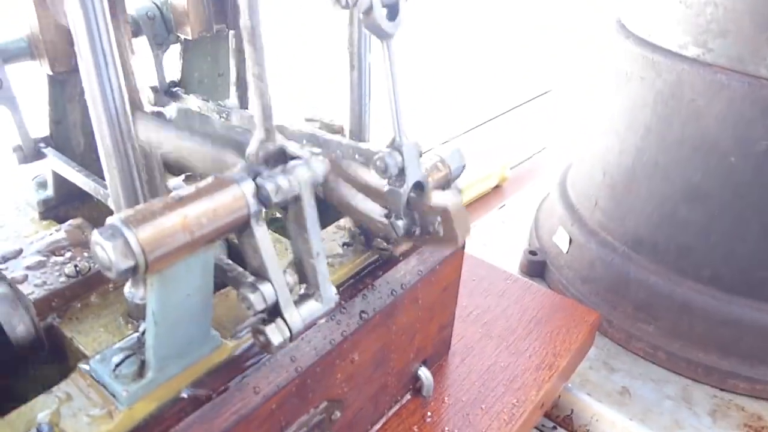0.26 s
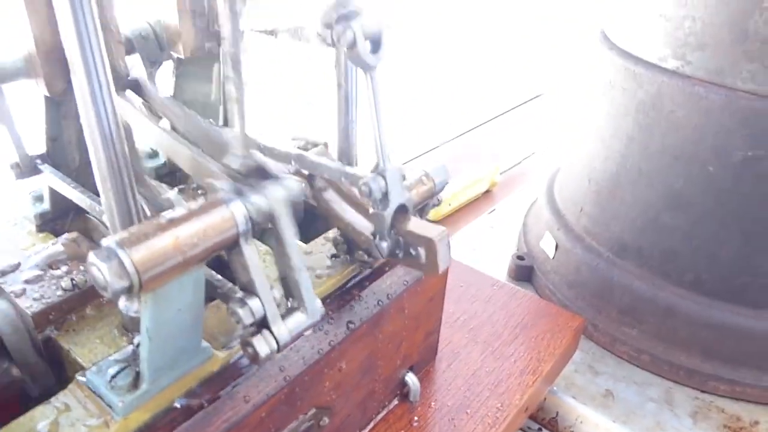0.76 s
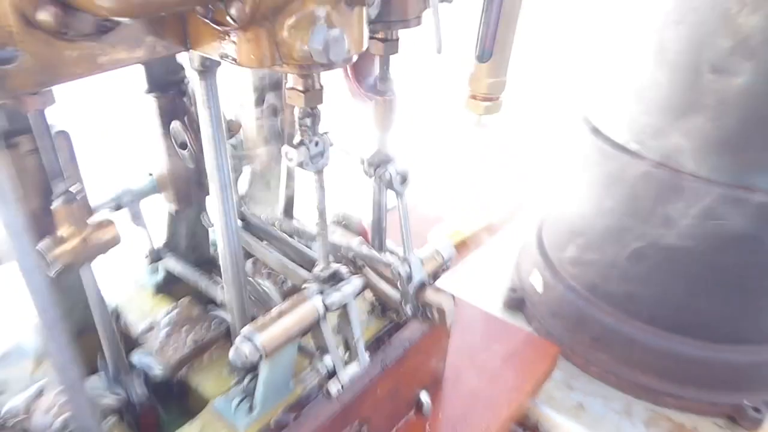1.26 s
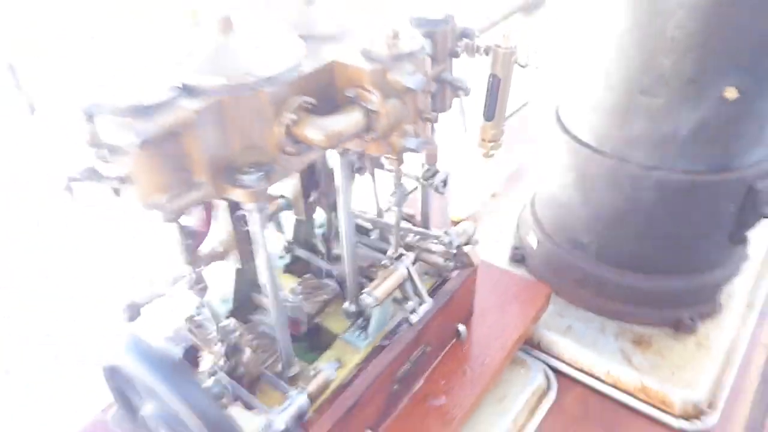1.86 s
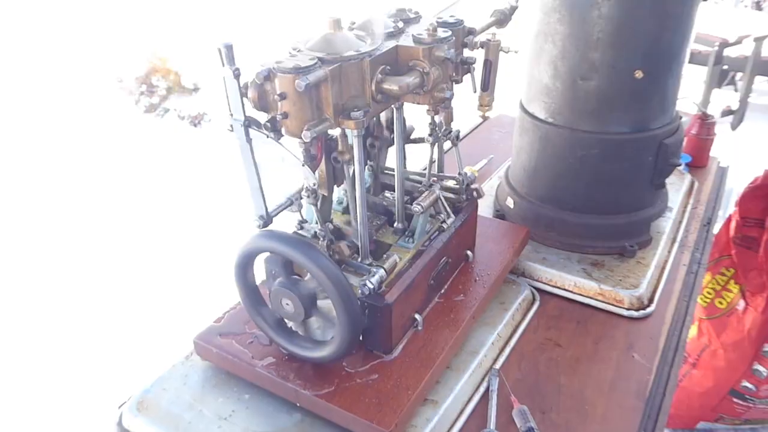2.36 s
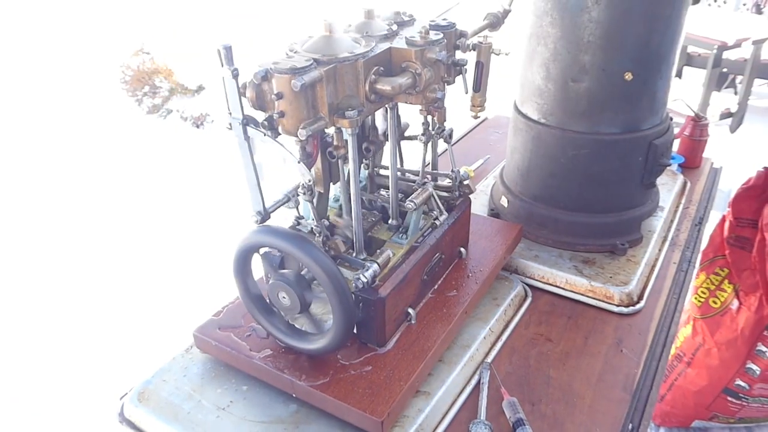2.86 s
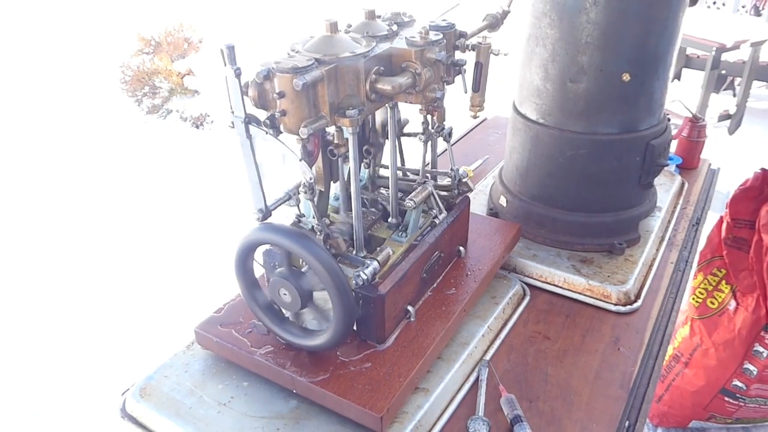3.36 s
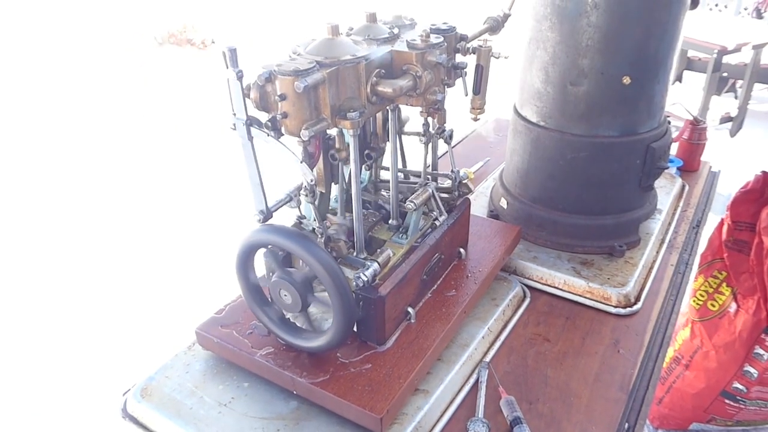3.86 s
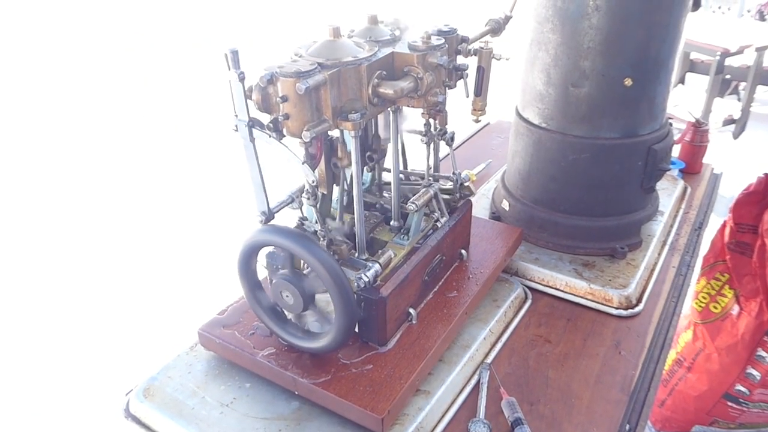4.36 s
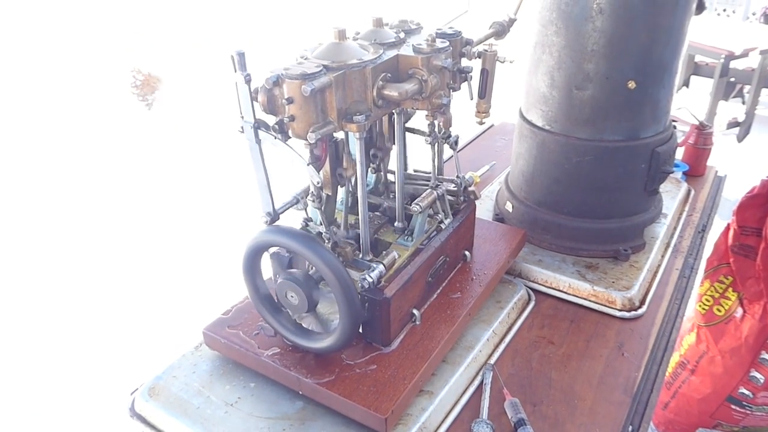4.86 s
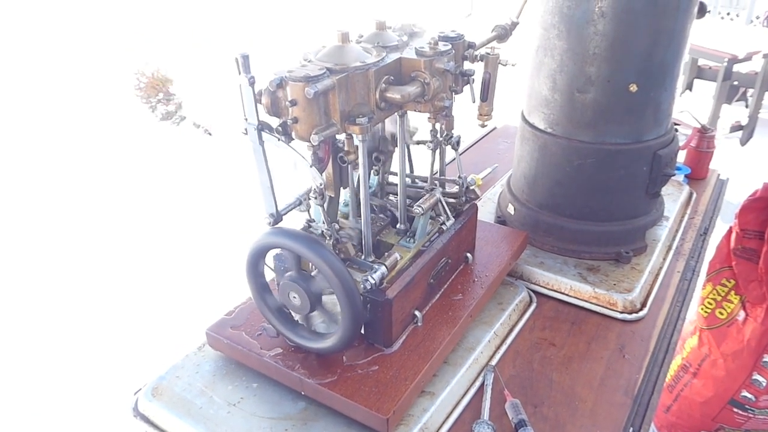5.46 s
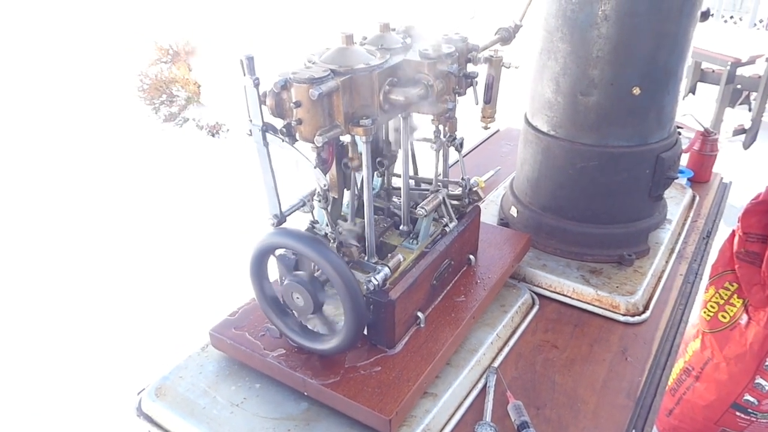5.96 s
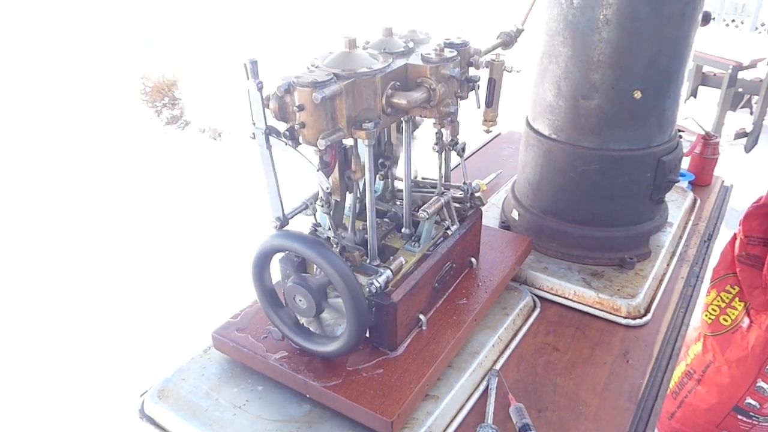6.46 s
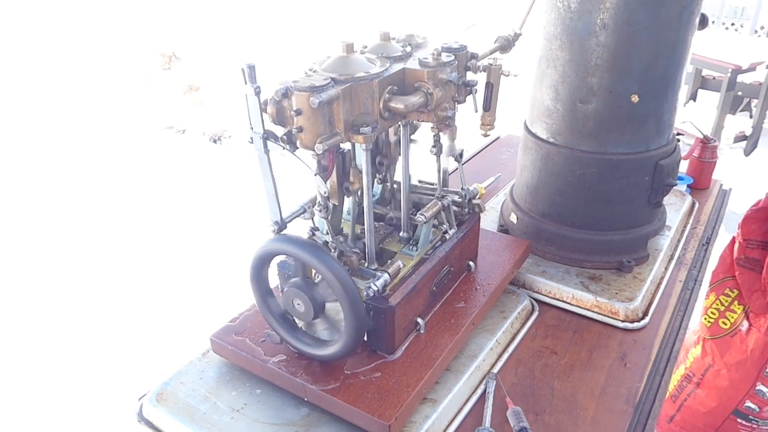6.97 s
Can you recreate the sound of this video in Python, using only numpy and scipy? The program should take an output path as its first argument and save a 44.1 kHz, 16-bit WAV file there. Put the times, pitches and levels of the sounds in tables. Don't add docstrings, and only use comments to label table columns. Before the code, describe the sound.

A small steam engine chuffs rapidly and evenly, hissing, spitting and knocking close up, then after a brief silent gap continues from slightly farther back.

```python
import sys
import numpy as np
from scipy import signal
from scipy.fft import rfft, irfft, next_fast_len
from scipy.io import wavfile
from scipy.ndimage import map_coordinates

SR = 44100
rng = np.random.default_rng(int(sys.argv[2]) if len(sys.argv) > 2 else 0)


def unload_wav(signal):
    wavfile.write(
        sys.argv[1],
        SR,
        np.round(np.clip(np.atleast_2d(signal).T, -1, 1) * 32767).astype(np.int16),
    )


def volts_from_db(level):
    exponent = np.asarray(level, float) / 20
    return 10 ** exponent


N = 317961

# start_s, end_s
BREAK_S = (2.3885, 2.6635)
# end_s, up_puff_db, down_puff_db, slam_db
TURNS = [(.17, -50, -50, -50), (0.448, -50, -27, -27), (0.728, -26, -26.5, -26), (0.974, -23.5, -19.5, -21),
         (1.215, -21.5, -25, -24.5), (1.452, -22.5, -25.5, -23), (1.691, -22, -21, -24.5),
         (1.941, -24, -24, -26), (2.185, -26, -27, -30), (2.431, -24, -26.5, -32), (2.69, -33, -35.5, -30),
         (2.948, -33, -30.5, -40), (3.2, -25.5, -28, -27.5), (3.458, -28, -24.5, -28),
         (3.715, -25, -27.5, -26.5), (3.981, -24, -27.5, -29), (4.242, -27, -28.5, -24.5),
         (4.507, -27.5, -29, -21.5), (4.768, -27.5, -27.5, -25.5), (5.033, -26, -25.5, -25),
         (5.295, -25.5, -26.5, -22.5), (5.56, -24.5, -26, -23), (5.826, -25, -26, -22),
         (6.094, -26, -26.5, -22), (6.361, -27, -26.5, -24.5), (6.625, -26, -28, -20.5),
         (6.883, -24, -25.5, -24), (7.146, -24.5, -25.5, -23), (7.405, -24, -26, -24)]
BOTTOM_CENTRE = 0.547
# centre_hz, width_hz, close_db, back_db
BED = [(106, 30, -16, -8.5), (152, 17, 0.5, 3), (199, 61, -11, -2.5), (290.4, 95, -12.5, -3)]


def at_hz(points, hz, column=1):
    table = np.array(points)
    return np.interp(np.log(hz), np.log(table[:, 0]), table[:, column])


def rms_one(x):
    return x / np.sqrt(np.mean(x ** 2))


def drift(per_s):
    r = np.exp(-40 * np.pi * per_s / SR)
    draws = rng.standard_normal(N // 20 + 402)
    slow = signal.lfilter([1], [1, -2 * r, r * r], draws)[400:]
    return np.interp(np.arange(N) / 20, np.arange(len(slow)), rms_one(slow))


def gusts(flicker_db):
    lumps = 0.59 * drift(30) + drift(37) + 1.38 * drift(180)
    return rms_one(volts_from_db(flicker_db * lumps))


def turbulence(pair, length, lead_s):
    size = next_fast_len(length, True)
    hz = np.arange(size // 2 + 1) * SR / size + 1
    mid, side = rfft(rng.standard_normal((2, size)))
    alike = np.clip(at_hz(pair, hz), 0, 1)
    lead_rad = at_hz(pair, hz, column=3) + 2 * np.pi * hz * lead_s
    tilt = volts_from_db(at_hz(pair, hz, column=2) / 2) * np.exp(.5j * lead_rad)
    same = np.sqrt(1 + alike) * mid
    differ = np.sqrt(1 - alike) * side
    return hz, np.array([(same + differ) * tilt, (same - differ) / tilt]), size


def both_places(colours, patchy_db, lead_s):
    # band_hz, likeness, left_right_db, left_lead_rad
    pair_close = [(59.2, 0.6, -0.5, 0.092), (200, 1, -1, 0), (800, 0.87, 1, 0.39), (1440, 0.53, 9, 0.72),
                  (2400, 0.61, 4.5, -0.55), (5200, 0.64, 0.5, -0.71), (7120, 0.95, 0, -1),
                  (8400, 0.36, -5.5, -1.3), (9300, 0.62, -5.5, 0.6), (13000, 0.55, 0.5, 0.15)]
    # band_hz, likeness, left_right_db, left_lead_rad
    pair_back = [(60, 0.73, 3, -0.11), (200, 1, -2.2, 0.12), (1100, 0.86, 1, 0.23), (2100, 0.85, 2, 0.15),
                 (4460, 0.84, 0.5, -0.24), (7600, 0.85, 1.3, -0.35), (9200, 1, -0.5, -1),
                 (10300, 0.74, -5.5, -0.023), (11900, 0.41, 3, -0.05)]
    cut = int(BREAK_S[0] * SR)
    gains = [volts_from_db(patchy_db * drift(35)) for _ in colours]
    parts = []
    for place, pair, span in ((0, pair_close, slice(0, cut)), (1, pair_back, slice(cut, N))):
        length = span.stop - span.start
        hz, white, size = turbulence(pair, length, lead_s)
        patches = [gain[span] * irfft(colour(hz, place) * white, size)[:, :length]
                   for colour, gain in zip(colours, gains)]
        parts.append(rms_one(sum(patches)))
    return np.hstack(parts)


def through(modes, flicker_db, lead_s=0, patchy_db=2.0):
    def response(mode):
        centre_hz, width_hz, *level_db = mode
        return lambda hz, place: volts_from_db(level_db[place]) / (1 + ((hz - centre_hz ** 2 / hz) / width_hz) ** 2)
    return both_places([response(mode) for mode in modes], patchy_db, lead_s) * gusts(flicker_db)


def swells(times, levels_db, rise_s, fall_s, squareness=2):
    out = np.zeros(N + SR)
    for s, level_db, rise, fall in np.broadcast(times, levels_db, rise_s, fall_s):
        at = np.arange(int((s - 4 * rise) * SR), int((s + 4 * fall) * SR))
        late = at / SR - s
        span = np.where(late < 0, rise, fall)
        out[at] += volts_from_db(level_db) * np.exp(-.5 * np.abs(late / span) ** squareness)
    return out[:N]


def at_share(share):
    s = np.array(TURNS)[:, 0]
    return s[:-1] + share * np.diff(s)


def leaks():
    # time_s, low_db, hiss_db
    steady = [(0, -43, -34.5), (.18, -37.5, -32), (.23, -40, -39.5), (.34, -44, -25), (.47, -45, -26.5),
              (0.62, -37.5, -28.5), (.8, -39, -27.5), (1.2, -37.5, -25), (1.8, -35, -27), (2.4, -39.5, -29),
              (2.7, -35, -26.5), (3, -41.5, -35), (3.501, -36.5, -29.5), (4, -37.5, -30.5),
              (4.5, -43.5, -34), (4.998, -41, -32), (6, -43, -32.5), (7.21, -41.5, -31)]
    # band_hz, level_db (per Hz)
    low_spectrum = [(24, -61), (40, -24), (163, -4.5), (383, -2.5), (498, -1), (1060, -4.5), (1510, -11.5),
                    (2000, -11), (2600, -35), (4400, -120)]
    # band_hz, level_db (per Hz)
    hiss_spectrum = [(880, -30), (1500, -3), (2260, 5), (2890, 6), (3180, 6.5), (5040, 1), (6620, 2.5),
                     (7450, 6), (7900, 1.5), (10300, 12), (12900, -9.5), (14500, -8), (15500, -58)]
    # band_hz, change_db
    hiss_close = [(1200, -3.5), (2000, -3), (3500, -3.5), (5200, 1.5), (6600, 4.5), (9000, -2), (11000, -1)]
    # delay_s, half_length_s, low_share_lost, hiss_share_lost
    sags = [
        (0.041, 0.038, 0.14, 0.57),
        (0.045, 0.013, 0.39, 0.42),
    ]
    deeper_close = 1.08

    s, low_db, hiss_db = np.transpose(steady)
    now = np.arange(N) / SR
    lulls = [swells(at_share(share) + delay, 0, half, half)
             for share, (delay, half, *_) in zip((BOTTOM_CENTRE, 0.98), sags)]
    lost = np.array(sags)[:, 2:].T @ lulls * np.where(now < BREAK_S[0], deeper_close, 1)
    keep_low, keep_hiss = 1 - np.clip(lost, 0, .9)

    def roar_colour(hz, place):
        return volts_from_db(at_hz(low_spectrum, hz))

    def hiss_colour(hz, place):
        return volts_from_db(at_hz(hiss_spectrum, hz) + (1.5 - place) * at_hz(hiss_close, hz))

    low = both_places([roar_colour], 3.55, 0) * gusts(0.49) * keep_low
    hiss = both_places([hiss_colour], 0.54, -0.0000022) * gusts(1) * keep_hiss
    return volts_from_db(np.interp(now, s, low_db) + 1.5) * low + volts_from_db(np.interp(now, s, hiss_db) + 1.0) * hiss


def puffs():
    # puff_turn_share, half_length_turn_share,
    # whistle_close_db, whistle_back_db, jet_close_db, jet_back_db
    strokes = [
        (0.346, 0.1, 2.5, -1.05, -5, 4.5),
        (0.85, 0.084, 2.5, -2.9, -8, 0),
    ]
    # time_s, lift_db
    sharpness = [(.4, -0.5), (.56, 6), (.8, -2), (1.05, -2.5), (1.5, -4), (1.9, -4), (2.1, 2), (2.4, -2),
                 (2.8, -0.5), (3.1, -3.5), (3.8, -6), (4.3, -0.5), (4.8, -2.5), (5.4, -2.5), (5.8, -1),
                 (6.4, 0.5), (7.21, -2.5)]
    # up_chimney_db, down_length_factor, down_chimney_db
    blows = [(-2.5, 1.33, -3.5), (0, 0.84, 2.5), (0.5, 0.83, -4), (-2.5, 1.17, -.5), (-1, 1.17, 1.5),
             (0.5, 0.91, -2.5), (1.5, 1.3, -2.5), (-1.5, 0.83, 2), (-1, 1.02, 2), (-.5, 2.3, 1),
             (3, 2.4, -3.5), (1.5, 1.8, -3), (1.5, 1.08, -5), (-3.5, 1.2, 0), (-2, 0.87, -0.5),
             (1.5, 0.98, 3.5), (2.5, 1.26, -1.5), (1, 0.94, 0.5), (0, 0.69, -0.5), (0, 1.32, 1),
             (-1.5, 0.92, 0.5), (2.5, 1.04, 0), (2.5, 1.04, 3), (4.5, 0.99, -0.5), (0, 1.19, 1),
             (3.5, 1.14, -0.5), (0, 0.99, -1), (-0.5, 1.02, -.5)]
    jet_follows = 0.9

    rows = []
    ends, up_db, down_db, _ = np.transpose(TURNS)
    up_trim_db, *down = np.transpose(blows)
    per_stroke = zip(strokes, (up_db[1:], down_db[1:]), ((1, up_trim_db), down))
    for (share, half, *lift_db), chimney_db, (stretch, boom_db) in per_stroke:
        s = at_share(share)
        whistle_db, jet_db = np.reshape(lift_db, (2, 2))[:, (s > BREAK_S[0]).astype(int)]
        sharp_db = np.interp(s, *np.transpose(sharpness))
        rows.append([s, chimney_db,
                     chimney_db + whistle_db + sharp_db,
                     chimney_db + jet_db + jet_follows * sharp_db,
                     half * stretch * np.diff(ends), boom_db])
    return np.hstack(rows)


def bent(x, percent):
    at = np.arange(N) + np.cumsum(percent) / 100
    return np.array([map_coordinates(side, [at], order=3, mode="mirror") for side in x])


def exhaust():
    chimney = [(482, 107, 5, -9.5), (637, 65, -4.5, -3.5), (803, 110, -1, -23), (1008, 450, 4, -5.5),
               (1059, 150, -6, -5.5)]
    # centre_hz, width_hz, close_db, back_db
    blast_pipe = [(2080, 1400, -0.5, -4), (2460, 90, -5, 0), (2820, 90, -9, 5), (2952, 96, 8, 4.5),
                  (3170, 330, 1.5, -6), (4400, 5600, -5, -7)]
    # centre_hz, width_hz, close_db, back_db
    whistle = [(5740, 360, -11, -3.5), (6650, 360, -3.5, 2), (6990, 340, 6.5, -23), (7366, 370, -4.5, 2)]
    # centre_hz, width_hz, close_db, back_db
    jet = [(8500, 300, -14, -2), (9210, 380, 6, 6), (10310, 420, 8, 4.5), (11250, 570, -6, -12.5),
           (14100, 1200, -30.5, -16)]
    # centre_hz, width_hz, close_db, back_db
    pop = [(506, 710, 1.5, -6), (627, 650, -6, -8)]
    # time_s, pitch_change_percent
    whistle_creep = [
        (.45, -1.43),
        (0.902, -0.86),
        (1.301, 0.36),
        (1.65, 1.76),
        (2.0, .4),
        (2.38, 0.32),
    ]
    whistle_sag = 0.76
    idle_s, idle_half_s, idle_whistle_db, idle_jet_db = 0.06, 0.088, -37, -36

    s, chimney_db, whistle_db, jet_db, half, boom_db = puffs()
    now = np.arange(N) / SR
    idle = np.exp(-.5 * ((now - idle_s) / idle_half_s) ** 2)

    chimney_puff = swells(s, chimney_db + boom_db - 1.5, 0.88 * half, 1.03 * half, 2.22)
    out = through(chimney, 1.16, patchy_db=2.5) * chimney_puff
    pipe_puff = swells(s, chimney_db - 5.5, 1.18 * half, 1.19 * half, 2.74)
    out += through(blast_pipe, 0.96, patchy_db=4.0) * pipe_puff

    rising = np.gradient(swells(s, 0, half, half)) * SR * half.mean() * (np.arange(N) < BREAK_S[0] * SR)
    creep = np.interp(now, *np.transpose(whistle_creep), right=0)
    whistle_puff = swells(s + 0.0014, whistle_db + 0.71, 1.07 * half, 0.9 * half, 2.7)
    whistling = bent(through(whistle, 0.96), creep + whistle_sag * rising)
    out += whistling * (whistle_puff + volts_from_db(idle_whistle_db) * idle)

    jet_puff = swells(s + 0.0079, jet_db - .8, 1.18 * half, 0.5 * half)
    out += through(jet, 0.82) * (jet_puff + volts_from_db(idle_jet_db) * idle)
    out += through(pop, 1.3) * swells(s - half, chimney_db - 15.5, 0.0018, 0.016)
    return out + through(BED, 0.99) * swells(s - .008, chimney_db - 18.0, 0.48 * half, 3.02 * half)


def crackle():
    # time_s, drops_per_s, size_db
    wetness = [
        (0, 190, -33),
        (.6, 60, -46),
        (2.3, 160, -21.5),
        (2.7, 330, -27.5),
        (3.3, 220, -23.5),
        (3.6, 120, -27),
        (4.399, 80, -27.5),
        (5, 28, -46),
        (7.21, 20, -45),
    ]
    draws = rng.random((1500, 5))
    times = .001 + draws[:, 0] * (N / SR - .02)
    s, per_s, size_db = np.transpose(wetness)
    level = np.interp(times, s, size_db) - 6.6 * np.log(draws[:, 1] + .1)
    rows = np.transpose([times, level - 8 * draws[:, 2], level - 22.0 + 12 * draws[:, 4]])
    return rows[draws[:, 3] * 1500 * SR / N < np.interp(times, s, per_s)]


def spits():
    # time_s,
    # body_db, bright_db, low_db
    ticks_close = [(0.065, -27, -24, -28), (0.1205, -19, -28, -35), (0.2162, -22, -31, -22),
                   (0.2496, -23, -24, -26), (0.399, -25, -26, -7), (0.6704, -42, -34, -19),
                   (0.7063, -29, -20, -22), (0.7896, -21, -21, -17), (0.859, -19, -22, -14),
                   (0.9153, -23, -20, -20), (1.0281, -12, -22, -13), (1.11, -13, -15.5, -13),
                   (1.281, -9, -22.5, -11), (1.339, -18, -24, -12), (1.3857, -21, -23, -19.5),
                   (1.4292, -16, -23, -30.5), (1.501, -18, -28, -17.5), (1.5145, -18, -25, -22),
                   (1.6576, -10, -20, -23), (1.7465, -12, -24.5, -25), (1.891, -24, -27.5, -21),
                   (1.906, -8.5, -23.5, -22), (2.2303, -20, -29.5, -17), (2.2973, -13.5, -26.5, -23)]
    # time_s, body_db, bright_db, low_db
    ticks_back = [(2.718, -20, -24, -9), (2.781, -19, -24, -27), (2.805, -11, -24, -23),
                  (2.9204, -11, -14, -28), (3.0748, -18, -24, -8), (3.1058, -24, -23, -14),
                  (3.246, -23, -19, -24), (3.3448, -17.5, -17, -19), (3.363, -29, -34, -24),
                  (3.387, -19, -32, -17), (3.5015, -31, -30, -19), (3.538, -15, -24, -19),
                  (3.603, -18, -24, -18), (3.6404, -17, -24, -12), (3.7808, -19, -28, -10),
                  (3.8564, -12, -21, -27), (3.916, -15, -20, -37), (4.0203, -12, -24, -7),
                  (4.0472, -30, -28, -28), (4.0683, -16, -26, -24), (4.1309, -17, -14, -16),
                  (4.1654, -21, -24, -28), (4.2192, -10.5, -26, -23), (4.3205, -12, -27, -11),
                  (4.3842, -26, -18, -10), (4.6196, -15, -24, -10), (4.6511, -26, -16, -7.5),
                  (4.7391, -17, -24, -23), (4.9107, -19, -23, -15), (4.9666, -25, -27, -28),
                  (5.1751, -24, -29, -11), (5.2225, -32, -28, -13), (5.342, -24, -27, -22),
                  (5.44, -20, -31, -17), (5.7034, -32, -36, -11.5), (5.8743, -19, -21, -31),
                  (5.9696, -26, -26, -12), (6.2366, -19, -17, -8.5), (6.5015, -17.5, -21, -13),
                  (6.7643, -15.5, -24, -10), (7.026, -30, -31, -12), (7.088, -22, -30, -22)]
    # time_s, body_db, bright_db
    drops_close = [(.149, -12.5, -30), (.173, -10, -28), (.1935, -15, -6), (.2608, -18, -28),
                   (.3072, -15, -31), (.352, -18.5, -17), (.3704, -10.5, -35), (.5624, -23, -27),
                   (1.092, -15, -27), (1.1502, -16, -10), (1.231, -26, -15), (1.4036, -10, -32),
                   (1.583, -7.5, -26), (1.617, -9, -13), (1.827, -14.5, -22), (1.8607, -19, -30),
                   (1.9109, -9.5, -16), (1.951, -7.5, -17), (1.9674, -12.5, -32), (1.993, -9, -23),
                   (2.0128, -12, -14), (2.067, -16.5, -28), (2.0733, -8.5, -13), (2.148, -9, -16.5),
                   (2.1864, -12, -31), (2.303, -14, -29), (2.3186, -10, -14), (2.337, -8.5, -22.5),
                   (2.3481, -8.5, -16), (2.3775, -10.5, -31)]
    # time_s, body_db, bright_db
    drops_back = [(2.673, -15.5, -9), (2.68, -13, -9), (2.691, -6.5, -26), (2.696, -8.5, -5),
                  (2.7262, -10.5, -3.5), (2.753, -19, -9), (2.827, -8.5, -6), (2.839, -9, -3),
                  (2.8526, -13, -3), (2.881, -7, -9), (2.9074, -24, -12), (2.953, -23, -15),
                  (2.9614, -11.5, -2), (3.007, -12.5, -10), (3.048, -12.5, -17), (3.1207, -10.5, -7.5),
                  (3.1442, -12, -8), (3.1537, -9, -15), (3.1947, -11.5, -15), (3.233, -10, -10),
                  (3.253, -20, -10), (3.418, -14, -9.5), (3.6306, -12.5, -7), (3.683, -24, -8.5),
                  (3.705, -9.5, -11), (3.8609, -6.5, -24), (4.0237, -14, -8.5), (4.1841, -9.5, -10.5),
                  (4.202, -28, -9.5), (4.4245, -20, -17), (4.5279, -9.5, -4.5), (4.753, -16, -18)]
    drop_hz = [7000, 6500, 6850, 5070, 5200, 1900, 3800, 7000, 5000, 2400, 5900, 6500, 6600, 3180, 2500,
               6000, 7000, 6930, 3400, 4800, 6900, 4400, 5950, 5040, 2500, 6700, 4500, 4000, 6100, 7100,
               4000, 5700, 3000, 6400, 6200, 6300, 7000, 6800, 6900, 4300, 1600, 5800, 6740, 2100, 4490,
               4500, 4300, 7000, 3380, 5300, 6600, 2480, 2300, 6300, 7000, 3200, 1600, 1700, 6700, 1600,
               6960, 4600]
    ring_width_hz, ring_share = 1300, .85
    small_drop_decay = .4
    bands = [(2000, 6140, 0.0019, -1.0), (6140, 11400, 0.0013, 1.0), (515, 2370, 0.005, -8.0)]

    drops = np.vstack([drops_close, drops_back, crackle()])[:, [0, 1, 2, 1]]
    rows = np.vstack([ticks_close, ticks_back, drops])
    tick_count = len(ticks_close) + len(ticks_back)
    listed_end = tick_count + len(drop_hz)
    listed = slice(tick_count, listed_end)
    after = np.arange(200) / SR
    out = np.zeros((2, N + len(after)))
    bursts = rng.standard_normal((len(bands), 2, 1700, len(after)))[:, :, :len(rows)]
    starts = ((rows[:, 0] - .0005) * SR).astype(int)[:, None] + np.arange(len(after))
    late = rows[:, :1] < BREAK_S[0]
    brief = np.where(np.arange(len(rows)) < listed_end, 1, small_drop_decay)[:, None]
    for k, (low_hz, high_hz, decay, gain_db) in enumerate(bands):
        noise = bursts[k, 0] + 0.51 * bursts[k]
        shared = noise * np.exp(-after / (decay * brief)) * np.minimum(after / 0.00039, 1)
        band = signal.butter(2, [low_hz, high_hz], "band", fs=SR, output="sos")
        shape = signal.sosfilt(band, shared)
        if k == 0:
            hz = np.arange(1, 258) * SR / 512
            own_hz = np.array(drop_hz)[:, None]
            resonance = 1 / (1 + 1j * (hz - own_hz ** 2 / hz) / ring_width_hz)
            ring = 1 - ring_share + 2 * ring_share * resonance
            shape[:, listed] = irfft(rfft(shape[:, listed], 512) * ring)[..., :len(after)]
        shape *= volts_from_db(rows[:, 1 + k, None] + gain_db) / np.abs(shape).max(axis=(0, 2))[:, None]
        for side in range(2):
            at = starts + late * (side == 0 and k != 1)
            out[side] += np.bincount(at.ravel(), shape[side].ravel(), len(out[side]))

    r, w = np.exp(-np.pi * 900 / SR), 2 * np.pi * 8800 / SR
    port = signal.lfilter([(1 - r * r) / 2, 0, (r * r - 1) / 2], [1, -2 * r * np.cos(w), r * r], out)
    out = out + 0.39 * port
    far_echo = volts_from_db(-32.0) * np.roll(out, int(0.0064 * SR), axis=1)
    near_echo = volts_from_db(-11.0) * np.roll(out, int(0.0047 * SR), axis=1)
    out = out + far_echo + near_echo
    out = signal.sosfilt(signal.butter(6, 11200, fs=SR, output="sos"), out)
    return volts_from_db([[-.9], [.9]]) * out[:, :N]


def thuds():
    # time_s,
    # pitch_hz, peak_db, t60_s
    slugs = [(0.193, 674, -14.5, 0.023), (0.1935, 1250, -20.5, 0.038), (.1955, 1000, -21.5, .03),
             (0.2, 453, -18.5, 0.057), (0.913, 430, -15.5, 0.029), (1.155, 435, -9, 0.018),
             (1.9503, 443.6, -6, 0.017), (1.9928, 1100, -14.5, 0.019), (3.232, 306, -19, 0.037),
             (4.02, 320, -17, 0.041), (4.187, 200, -16, 0.039), (0.37, 3800, -12, 0.01),
             (6.047, 620, -17, 0.035), (2.6965, 1650, -11, .012), (2.697, 2310, -10, 0.0073),
             (.545, 390, -26, 0.14), (3.975, 810, -17.5, 0.06), (.271, 760, -26.5, .05)]
    out = np.zeros(N)
    after = np.arange(4000) / SR
    for s, hz, peak_db, t60 in slugs:
        ring = volts_from_db(peak_db - 60 * after / t60) * np.sin(2 * np.pi * hz * after)
        out[int(s * SR):][:len(after)] += ring * np.minimum(hz * after / 1.1, 1)
    return out


def dead_centres():
    # knock_close_db, spurt_close_db, knock_back_db, spurt_back_db
    centres = [
        (-7, -12.5, -13, -8.5),
        (-10, -3, -11, -1),
    ]
    scatter_db = 1.5
    rows = []
    ends, up_db, _, slam_db = np.transpose(TURNS[1:])
    for s, base_db, lift_db in zip((at_share(BOTTOM_CENTRE), ends), (up_db, slam_db), centres):
        play_db = scatter_db * rng.standard_normal((len(s), 2)) * [1, .5]
        place_db = np.reshape(lift_db, (2, 2))[(s > BREAK_S[0]).astype(int)]
        rows.append(np.vstack([s, base_db + (place_db + play_db).T]))
    return np.hstack(rows)


def reversals():
    # centre_hz, width_hz, close_db, back_db
    clack_modes = [(1900, 500, -2.5, -4.5), (2544, 460, -2, -0.5), (4300, 4800, -7.5, -9.5),
                   (5410, 470, -2.5, -1.5)]
    # centre_hz, width_hz, close_db, back_db
    knock_modes = [(477, 450, -6, -21.5), (830.5, 60, -2, 1)]
    # centre_hz, width_hz, close_db, back_db
    spurt_modes = [(6870, 82, 0.5, -7), (8920, 1100, -13.5, 9), (9980, 2400, -10, 5),
                   (13300, 2500, -42, -31)]
    # time_s, dull_db, bright_db
    clacks = [(0.441, -18, -27.5), (0.7208, -20, -24), (0.9706, -17, -25), (1.2093, -16.5, -20.5),
              (1.4511, -16, -27), (1.6925, -29, -21), (1.9484, -18, -37), (2.18, -24, -24),
              (2.94, -26, -29), (3.1935, -19, -39), (3.4544, -33, -27), (3.7128, -24, -25.5),
              (3.979, -17, -26), (4.2372, -20, -29), (4.503, -16, -27), (4.769, -22, -25),
              (5.028, -18.5, -27), (5.2913, -14.5, -25.5), (5.556, -20.5, -24.5), (5.8254, -19, -26),
              (6.089, -13.5, -23.5), (6.358, -18, -32), (6.618, -18, -25), (6.8813, -17, -21.5),
              (7.1411, -15.5, -26)]

    s, knock_db, spurt_db = dead_centres()
    clack_s, dull_db, bright_db = np.transpose(clacks)
    rattle = through(clack_modes, 0.39, lead_s=2e-6)
    bright = signal.sosfiltfilt(signal.butter(2, 4300, "high", fs=SR, output="sos"), rattle)
    out = (rattle - bright) * swells(clack_s + 0.0014, dull_db - 9.0, 0.0022, 0.0094)
    out += bright * swells(clack_s + 0.0014, bright_db + 3.0, 0.0022, 0.0094)
    out += through(knock_modes, 0.92) * swells(s, knock_db + 0.5, 0.0054, 0.01)
    out += through(spurt_modes, 2.0, lead_s=1.2e-6) * swells(s, spurt_db + 0.33, 0.013, 0.016)
    return out + through(BED, .75) * swells(s + 0.0041, knock_db - 5.0, 0.0061, 0.0089)


def scene():
    now = np.arange(N) / SR
    fade_out = np.clip((BREAK_S[0] - now) / 0.0024, 0, 1)
    fade_in = np.clip((now - BREAK_S[1]) / 0.0029, 0, 1) ** 2
    return (leaks() + exhaust() + spits() + thuds() + reversals()) * (fade_out + fade_in)


def roll_off(x):
    return signal.sosfilt(signal.butter(12, 15900, fs=SR, output="sos"), x)


def record(dry):
    thin = signal.sosfilt(signal.butter(2, 95, "high", fs=SR, output="sos"), dry)
    over = np.maximum(20 * np.log10(np.abs(thin).max(axis=0) + 1e-6) + 4.4, 0)
    climb = 230 * np.arange(N) / SR
    duck = np.maximum.accumulate(3.3 * over + climb) - climb
    r = np.exp(-1 / (0.014 * SR))
    smooth_duck = signal.lfilter([(1 - r) ** 2], [1, -2 * r, r * r], duck)
    ducked = thin * volts_from_db(-smooth_duck)
    cut = signal.sosfilt(signal.cheby2(10, 60, 16200, fs=SR, output="sos"), ducked)
    return roll_off(np.clip(cut, -1, 1))


dry = scene()
out = record(dry)
unload_wav(out)
```